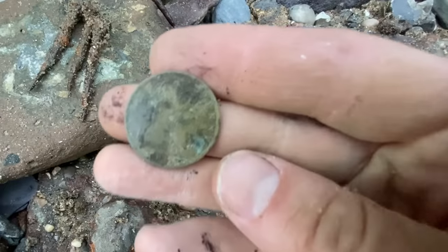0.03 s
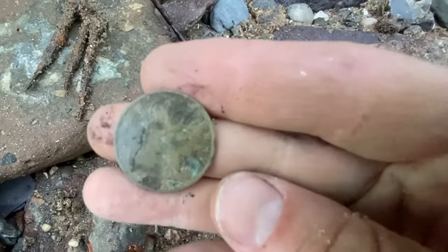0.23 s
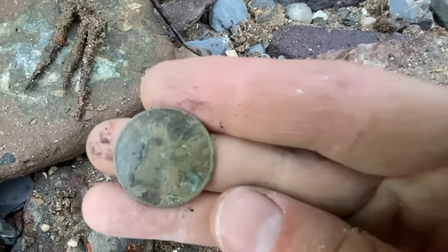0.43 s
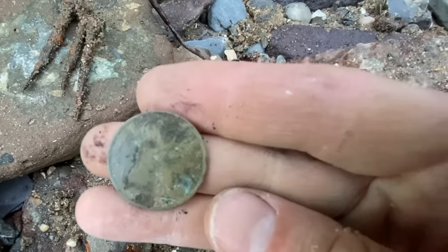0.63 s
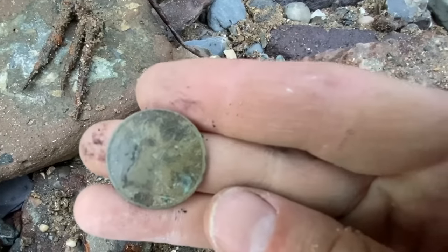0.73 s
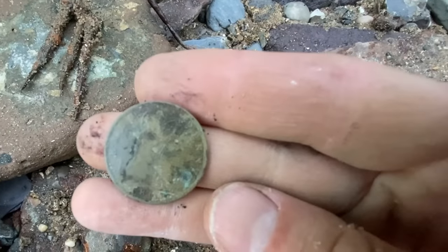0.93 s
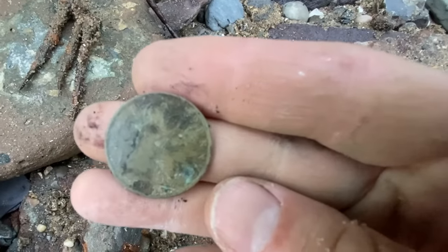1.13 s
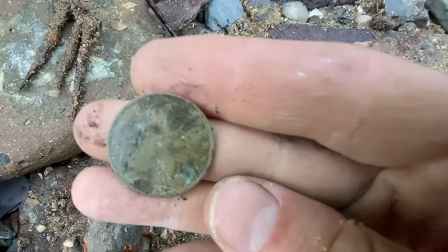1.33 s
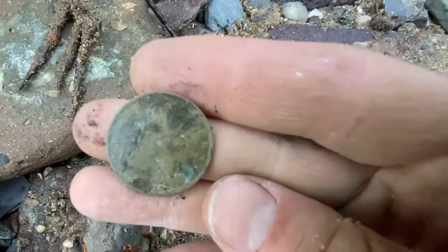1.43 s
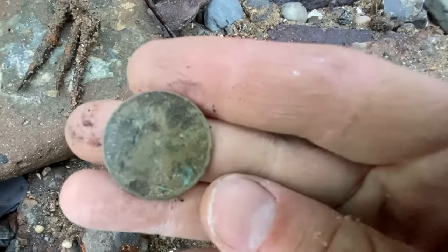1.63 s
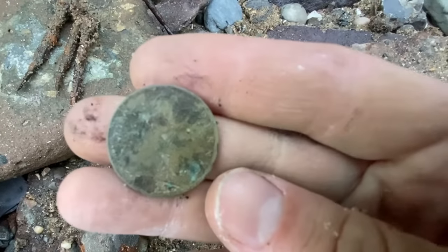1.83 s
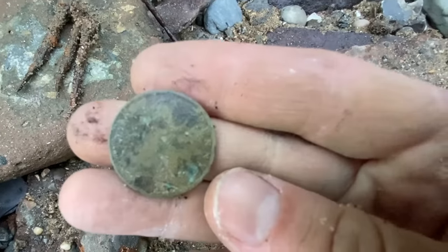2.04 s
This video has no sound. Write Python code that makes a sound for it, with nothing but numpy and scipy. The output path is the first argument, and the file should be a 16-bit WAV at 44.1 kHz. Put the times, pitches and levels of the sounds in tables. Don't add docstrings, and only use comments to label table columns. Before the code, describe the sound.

Metal blade clatters over shingle, grit crunches under shifting weight, and a sharper clatter ends it

```python
import sys
import numpy as np
from scipy import signal
from scipy.io import wavfile

SR = 44100
rng = np.random.default_rng(int(sys.argv[2]) if len(sys.argv) > 2 else 0)


def file_out(sig):
    cols = np.atleast_2d(sig).T
    lim = np.clip(cols, -1, 1)
    pcm = np.round(lim * 32767).astype(np.int16)
    wavfile.write(sys.argv[1], SR, pcm)


def volts_from_decibels(level):
    exponent = np.asarray(level, float) / 20
    return 10 ** exponent


N = 91551
TIME_S = np.arange(N) / SR
EDGES_HZ = 25 * 2 ** np.arange(0, 9.7, 1 / 2.5)
CENTRES_HZ = np.sqrt(EDGES_HZ[1:] * EDGES_HZ[:-1])


def rms_one(x):
    return x / np.sqrt(np.mean(x ** 2) + 1e-20)


def bandpass(x, order, low_hz, high_hz):
    return signal.sosfilt(signal.butter(order, [low_hz, high_hz], "band", fs=SR, output="sos"), x)


def drift(rate_hz):
    knots = rng.standard_normal(700)
    return np.interp(TIME_S * rate_hz, np.arange(len(knots)), knots) * 1.2


def grains(per_s, spread_db, smooth):
    sizes = volts_from_decibels(spread_db * np.minimum(rng.exponential(1, N), 5)) * rng.choice([-1, 1], N)
    contacts = rms_one(sizes * (rng.random(N) < per_s / SR))
    return rms_one(contacts + smooth * rng.standard_normal(N))


def with_clicks(touch, rows, click):
    out = touch.copy()
    starts_s = np.array([row[0] for row in rows])
    out[(starts_s * SR).astype(int) + 24] += click
    return out


def bands(x, spectrum):
    hz, db = np.transpose(spectrum)
    below_octaves = np.maximum(np.log2(hz[0] / CENTRES_HZ), 0)
    gain = volts_from_decibels(np.interp(np.log(CENTRES_HZ), np.log(hz), db) - 4 * below_octaves)
    gain = gain * (-1) ** np.arange(len(gain))
    out = np.array([g * bandpass(x, 2, low, high) for low, high, g in zip(EDGES_HZ, EDGES_HZ[1:], gain)])
    return out / np.sqrt(np.mean(out.sum(axis=0) ** 2))


def ring(x, hz, t60):
    r, w = volts_from_decibels(-60 / (t60 * SR)), 2 * np.pi * hz / SR
    return signal.lfilter([0, np.sin(w)], [1, -2 * r * np.cos(w), r * r], x + 1e-18)


def blow(s, t60, attack_s=.0006):
    start = int(s * SR)
    t = np.arange(min(int(.15 * SR), N - start)) / SR
    decay = volts_from_decibels(-60 * t / np.maximum(t60, .004))
    return slice(start, start + len(t)), (1 - np.exp(-t / attack_s)) * decay


def burst(coloured, s, db, t60, colour_db, attack_s=.0006):
    band_t60 = t60 * (CENTRES_HZ[:, None] / 4000) ** -0.46
    span, shape = blow(s, band_t60, attack_s)
    return span, (volts_from_decibels(db + colour_db[:, None]) * shape * coloured[:, span]).sum(axis=0)


# frequency in Hz, level in dB.
RUMBLE_SPECTRUM = [(15, -50), (25, -23), (88, -3), (231, -5.5), (363, -17.5), (501, -12), (749, -21.5),
                   (8780, -87.5), (15000, -86.5)]


def rumble():
    parts = bands(rng.standard_normal(N), RUMBLE_SPECTRUM)
    return volts_from_decibels(-45.5) * sum(volts_from_decibels(2.67 * drift(5.5)) * band for band in parts)


# time in seconds, level in dB, brightness in dB per octave.
WEIGHT = [(0, -60.5, -7.5), (.022, -66, -7.5), (.03, -37.5, -0.5), (.18, -29, -2), (0.209, -39, -2),
          (0.398, -36, -1), (0.428, -49, -3), (0.599, -66.5, 0.5), (0.774, -67.5, 0.5), (0.791, -37, -1),
          (1.02, -27.5, 0), (1.101, -43, -1.5), (1.36, -41, -3), (1.52, -49.5, -5), (1.65, -66, -3.5),
          (1.87, -65, 5.5), (1.94, -29, -4), (2.07, -53, 3)]
# frequency in Hz, density in dB per Hz.
GRIT_SPECTRUM = [(260, -25.5), (450, -1), (2130, -10.5), (2580, -0.5), (6570, -4), (7070, -0.5),
                 (11000, -6), (15500, -15)]


def grit():
    s, db, lean = np.transpose(WEIGHT)
    db, lean = np.interp(TIME_S, s, db), np.interp(TIME_S, s, lean)
    taps, chip = grains(2500, 3.42, 0.022), rng.integers(0, 30, N)
    chips = np.zeros(N)
    for k, hz in enumerate(np.geomspace(900, 14000, 30)):
        chips += ring(taps * (chip == k), hz, 45 / hz) * (hz / 4000) ** .5
    sand = grains(6000, 3, .8) + rms_one(chips)
    clump = .5 * drift(50) + drift(95)
    fine = np.zeros(N)
    for hz, band in zip(CENTRES_HZ, bands(sand, GRIT_SPECTRUM)):
        fine += volts_from_decibels(2.9 * clump + 1.85 * drift(150.0) + lean * np.log2(hz / 4000)) * band
    return volts_from_decibels(db) * rms_one(fine)


# frequency in Hz, level in dB.
PRESSED_MODES = [(2750, -2), (3800, -7), (4680, -4), (5750, -7), (7150, -3), (7900, -4), (10400, -6),
                 (11600, -8)]


def pressed(kicks):
    return volts_from_decibels(-24) * sum(volts_from_decibels(db) * ring(kick, hz, .023) for kick, (hz, db) in zip(kicks, PRESSED_MODES))


# start in seconds, peak in dB, t60 in seconds,
# thud in dB, damped blade in dB.
FIRST_RATTLE = [(0.0252, -5.5, 0.046, -14, -2), (0.0431, -18, 0.068, -8.5, -17),
                (0.059, -7, 0.038, -8.5, 0.5), (0.0755, -13.5, 0.028, -14, -12),
                (0.0788, -20, 0.019, -7.5, -23), (0.0950, -9.5, 0.034, -20, 1.5),
                (0.1015, -13, 0.061, -11, -20), (0.1236, -8.5, 0.022, -6.5, -11),
                (0.1325, -18, 0.049, -20, -14), (0.1428, -11, 0.049, -12.5, -22),
                (0.1508, -13.5, 0.016, -32, 2), (0.1653, -13.5, 0.043, -18, -10),
                (0.1776, -23, 0.0063, -21, -4)]
SECOND_RATTLE = [(1.776, -35.5, 0.097, -13, -4), (1.783, -32.5, 0.098, -16, -4), (1.808, -45, 0.06, -6, 2),
                 (1.85, -42, 0.023, -33, 7), (1.859, -26, 0.029, -37, -4.5), (1.8717, -22.5, 0.011, -37, 0),
                 (1.879, -26.5, 0.012, -37, -22), (1.8836, -17, 0.031, -44, -18),
                 (1.8992, -10, 0.018, -24, -14), (1.914, -29, 0.11, -37, -12),
                 (1.9431, -15.5, 0.046, -8.5, -14), (1.9618, -8, 0.037, -17, -10),
                 (1.9661, -8.5, 0.033, -18, -13), (1.975, -10, 0.045, -11.5, -1),
                 (1.982, -11.5, 0.033, -8.5, -12), (1.9871, -20, 0.035, -22, -15),
                 (1.996, -18.5, 0.024, -26, -2), (2.006, -14.5, 0.049, -10, 5),
                 (2.0156, -2, 0.024, -41, -21), (2.020, -11, 0.013, -5, 3), (2.0416, -10, 0.015, -6, -7),
                 (2.0454, -14, 0.02, -29, -4)]
# frequency in Hz, density in dB per Hz.
CRACK_SPECTRUM = [(900, -6), (1500, -4.5), (2100, -4.5), (2800, -2), (5300, -8.5), (7300, 2), (13000, -1.5),
                  (15500, -16.5)]
# frequency in Hz, level in dB, t60 in seconds.
STONE_MODES = [(630, -24, .035), (760, -23, .03), (980, -23, .03)]
# frequency in Hz, level in dB, t60 in seconds.
FREE_MODES = [(1110, -3, .1), (1610, -14, .1), (2328, -2.5, .15), (2745, -3, .04), (2880, -4, .11),
              (4670, -12, .25), (7120, -8, .045), (10420, -4, .05), (12550, -10, .03)]
# start in seconds, kick in dB, treble lean in dB per octave.
FREE_BOUNCES = [
    (0.074, -46, -18),
    (0.096, -33, -9),
    (1.966, -19, 1.5),
    (2.019, -18, 0),
    (2.046, -26.5, 8),
]


def trowel():
    rows, out = FIRST_RATTLE + SECOND_RATTLE, np.zeros(N)
    touch = with_clicks(grains(5000, 3.0, .6), rows, 5.0)
    crack = bands(touch, CRACK_SPECTRUM)
    thud = rms_one(bandpass(touch, 3, 445, 1425))
    chance = rng.standard_normal((len(rows), 40))
    damped, free = np.zeros((len(PRESSED_MODES), N)), np.zeros((len(FREE_MODES), N))
    for (s, db, t60, thud_db, blade_db), luck in zip(rows, chance):
        span, sound = burst(crack, s, db - 7.5, t60, 4.6 * luck[:len(CENTRES_HZ)])
        thump = volts_from_decibels(db + thud_db - 7.5) * blow(s, t60 * 0.29)[1] * thud[span]
        stone = sum(volts_from_decibels(level_db) * ring(thump, hz, t) for hz, level_db, t in STONE_MODES)
        out[span] += sound + 3.7 * thump + stone
        kick_db = db + blade_db + 4 * luck[-len(PRESSED_MODES):, None]
        damped[:, span] += volts_from_decibels(kick_db) * blow(s, .5 * t60)[1] * touch[span]
    for s, db, lean in FREE_BOUNCES:
        for k, (hz, _, _) in enumerate(FREE_MODES):
            free[k, int(s * SR)] = (-1) ** k * volts_from_decibels(db + lean * np.log2(hz / 3000))
    ringing = sum(volts_from_decibels(db - 1.5) * ring(kick, hz, t60) for kick, (hz, db, t60) in zip(free, FREE_MODES))
    return out + pressed(damped) + ringing


# time in seconds, pitch in Hz, level in dB, t60 in seconds.
SINGING_CHIPS = [(0.0266, 7460, -12, 0.0094), (0.0255, 4530, -17, 0.027), (0.0399, 6060, -28, 0.012),
                 (0.0455, 4450, -30, 0.016), (0.0599, 7570, -17, 0.01), (0.0629, 11400, -38, 0.01),
                 (0.0803, 1042, -19.5, 0.031), (0.097, 4550, -26, 0.077), (0.1247, 4520, -22, 0.027),
                 (0.1344, 3250, -18, 0.014), (0.1367, 3820, -18.5, 0.02), (0.142, 12880, -20, 0.013),
                 (0.1543, 1610, -14, 0.0098), (0.1666, 7620, -17, 0.023), (0.168, 970, -15, 0.015),
                 (0.1706, 4570, -29.5, 0.036), (0.2325, 3330, -27, 0.012), (0.2972, 2846, -25, 0.05),
                 (0.943, 13300, -39, 0.012), (0.9548, 5970, -24, 0.014), (0.9708, 3820, -17.5, 0.013),
                 (0.9718, 10380, -18, 0.013), (1.0083, 2470, -20, 0.039), (1.0097, 5600, -16, 0.014),
                 (1.0107, 7220, -13.5, 0.015), (1.0633, 3170, -30, 0.037), (1.7872, 7220, -29, 0.015),
                 (1.862, 2570, -37, 0.012), (1.8848, 2790, -20, 0.014), (1.9003, 2730, -19.5, 0.013),
                 (1.8997, 4750, -21, 0.013), (1.8992, 8300, -17.5, 0.009), (1.9426, 992, -14.5, 0.021),
                 (1.9434, 7410, -16, 0.012), (1.9627, 1030, -26.5, 0.081), (1.964, 5220, -15.5, 0.013),
                 (1.963, 10340, -17, 0.06), (1.967, 6940, -15.5, 0.014), (1.9716, 2730, -18, 0.007),
                 (1.986, 9200, -20, 0.015)]


def pings():
    out = np.zeros(N)
    for s, hz, db, t60 in SINGING_CHIPS:
        span, shape = blow(s - .0015, 1.75 * t60, attack_s=0.00099)
        out[span] += volts_from_decibels(db - 0.5) * shape * np.sin(2 * np.pi * hz * np.arange(len(shape)) / SR)
    return out


# start in seconds, peak in dB, pitch in Hz, t60 in seconds.
PEBBLE_KNOCKS = [(0.2327, -23.5, 3360, 0.16), (0.2465, -14.5, 3150, 0.041), (0.2855, -15.5, 6270, 0.1),
                 (0.291, -14, 5000, 0.044), (0.2953, -9.5, 2810, 0.02), (0.355, -8.5, 7760, 0.047),
                 (0.363, -23, 5250, 0.073), (0.3672, -10.5, 3270, 0.033), (0.3898, -26, 2930, 0.074),
                 (0.4204, -26, 9550, 0.041), (0.459, -30, 9700, 0.038), (0.4654, -30.5, 2630, 0.079),
                 (0.4774, -44, 2800, 0.025), (0.5005, -32, 10600, 0.03), (0.524, -40.5, 3400, 0.23),
                 (0.5561, -41.5, 3130, 0.11), (0.62, -50, 9680, 0.079), (0.6355, -37.5, 2750, 0.051),
                 (0.7818, -24.5, 9780, 0.11), (0.814, -17.5, 9700, 0.15), (0.831, -13, 11600, 0.045),
               (0.8387, -7, 9600, 0.0098), (0.864, -25, 9450, 0.025), (0.884, -10, 10250, 0.08),
               (0.9027, -13, 9200, 0.038), (0.941, -8.5, 3880, 0.029), (0.9527, -16, 5700, 0.069),
               (0.9704, -21, 3820, 0.013), (1.0064, -14, 2570, 0.063), (1.0131, -11, 7500, 0.092),
               (1.0282, -21.5, 5200, 0.13), (1.0438, -20.5, 3470, 0.084), (1.0712, -26.5, 3150, 0.22),
               (1.137, -23.5, 3380, 0.2), (1.157, -36, 3100, 0.081), (1.297, -25, 3740, 0.18),
               (1.3395, -23.5, 10000, 0.28), (1.4535, -24, 1980, 0.062), (1.4994, -28.5, 8600, 0.056),
               (1.5294, -57, 3520, 0.018), (1.5469, -27, 3500, 0.03), (1.6042, -38, 2375, 0.051)]


def pebbles():
    rows, out = PEBBLE_KNOCKS, np.zeros(N)
    kicks = np.zeros((len(PRESSED_MODES), N))
    touch = with_clicks(grains(4500, 3, .7), rows, 6.4)
    spill = bands(touch, GRIT_SPECTRUM)
    chance = rng.standard_normal((len(rows), len(CENTRES_HZ)))
    load_s, _, load_lean = np.transpose(WEIGHT)
    for (s, db, hz, t60), luck in zip(rows, chance):
        lean_db = np.interp(s, load_s, load_lean) * np.log2(CENTRES_HZ / 4000)
        focus_db = -4.5 * np.abs(np.log2(CENTRES_HZ / hz))
        span, sound = burst(spill, s, db - 9, t60, 2 * luck + lean_db + focus_db, attack_s=.0012)
        kick_db = db + 2.5 * luck[:len(PRESSED_MODES), None]
        kicks[:, span] += volts_from_decibels(kick_db) * blow(s, .5 * t60)[1] * touch[span]
        knock = blow(s, 0.14 * t60)[1] * touch[span]
        out[span] += sound + volts_from_decibels(db - 21.5) * ring(knock, hz, 78 / hz)
    return out + volts_from_decibels(-23.0) * pressed(kicks)


# time in seconds, peak in dB.
STONE_SLIPS = [
    (0.557, -35),
    (0.8149, -13.5),
    (1.365, -33),
    (1.4522, -14.5),
    (1.48, -24),
    (1.568, -48.5),
]


def snaps():
    clicks = np.zeros(N)
    for s, db in STONE_SLIPS:
        clicks[int(s * SR)] = -volts_from_decibels(db + 13)
        clicks[int((s + .0013) * SR)] = volts_from_decibels(db + 10)
    return bandpass(clicks, 4, 700, 3700)


# time in seconds, level in dB.
DRAG_LEVEL = [
    (1.914, -94),
    (1.918, -42),
    (1.94, -31),
    (1.951, -30),
    (1.96, -77),
]


def drag():
    scrape = grains(3400, 1.8, 0.17)
    hum = rms_one(ring(scrape, 2740, 0.024)) + 0.55 * rms_one(ring(scrape, 7150, 0.029))
    return volts_from_decibels(np.interp(TIME_S, *np.transpose(DRAG_LEVEL), left=-120, right=-120)) * hum


def scene():
    near = trowel() + pebbles() + snaps() + grit() + pings() + drag()
    near = signal.sosfilt(signal.butter(2, 120, "high", fs=SR, output="sos"), near)
    return (near + rumble())[None]


def top_cut(x):
    return signal.sosfilt(signal.butter(12, 16970, fs=SR, output="sos"), x)


def record(dry):
    rounded = .95 * np.tanh(dry / .95)
    mix = signal.sosfilt(signal.cheby2(12, 60, 16250, fs=SR, output="sos"), rounded)
    return top_cut(mix)


dry = scene()
out = record(dry)
file_out(out)
```